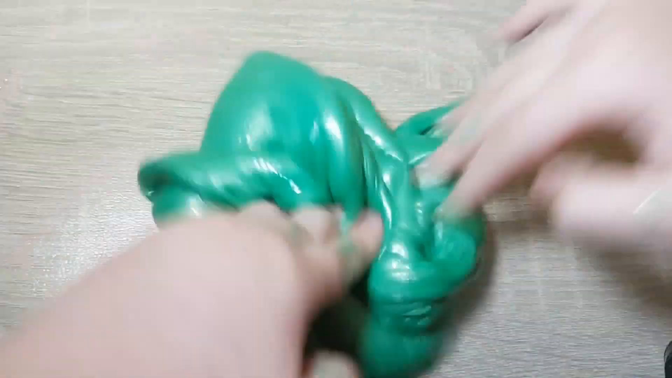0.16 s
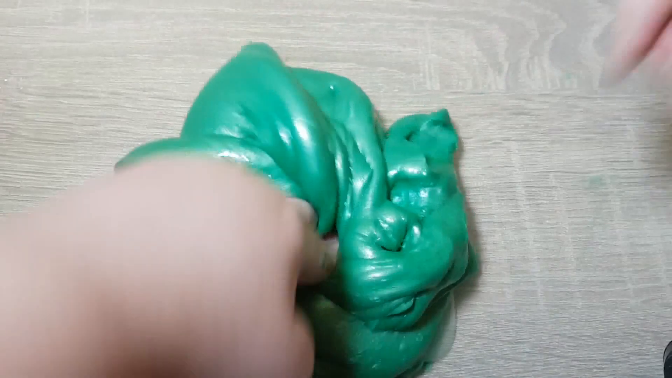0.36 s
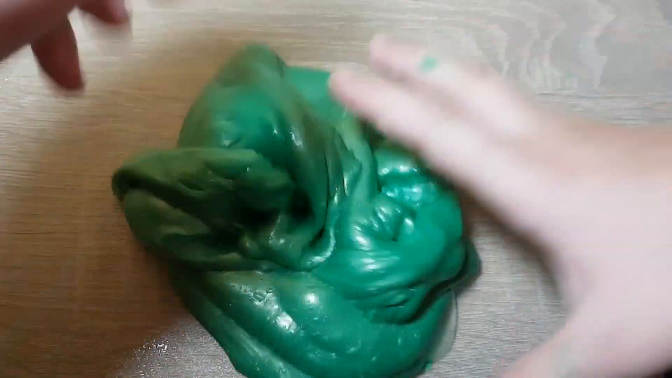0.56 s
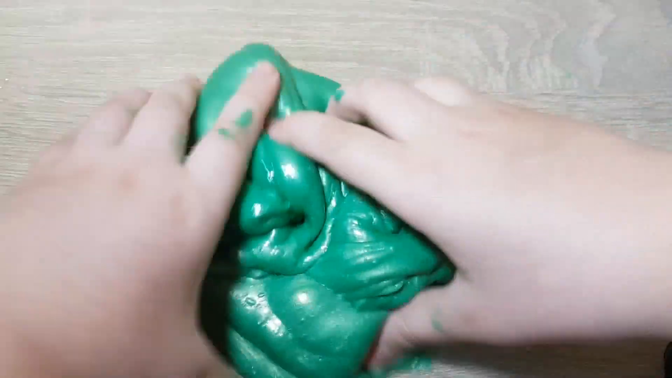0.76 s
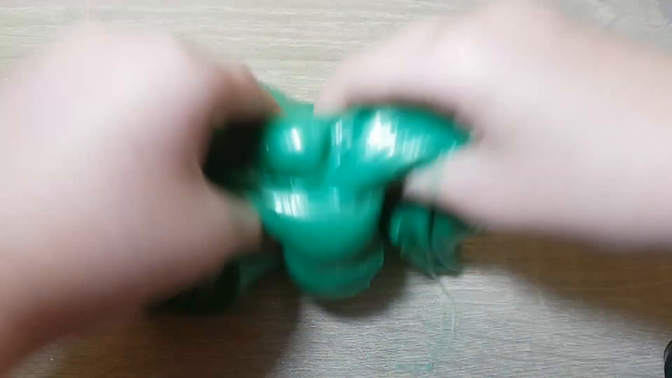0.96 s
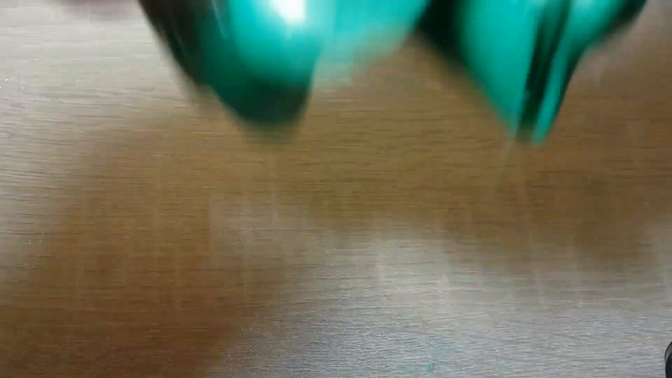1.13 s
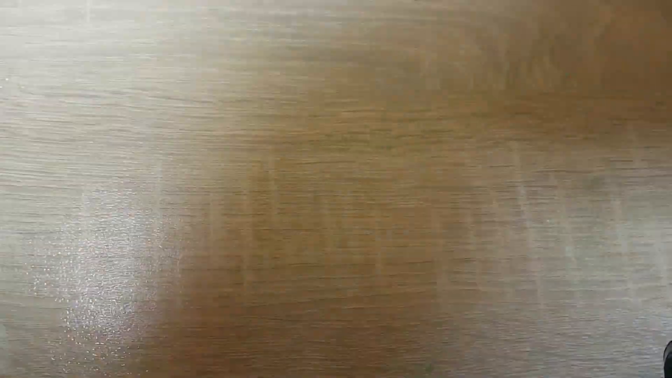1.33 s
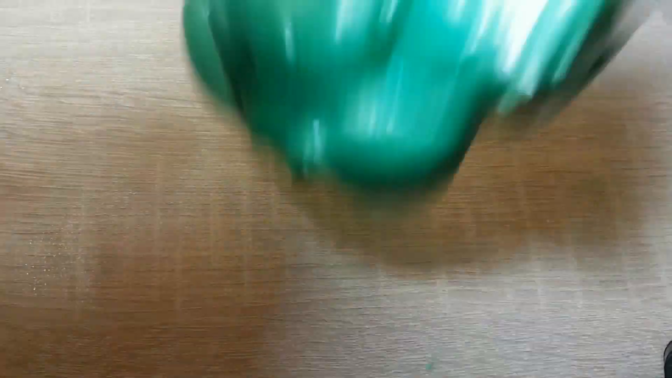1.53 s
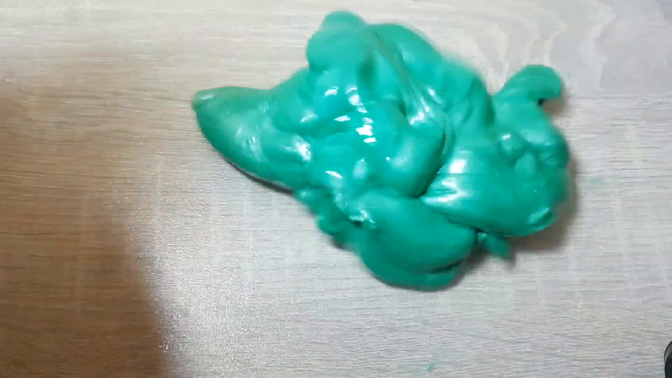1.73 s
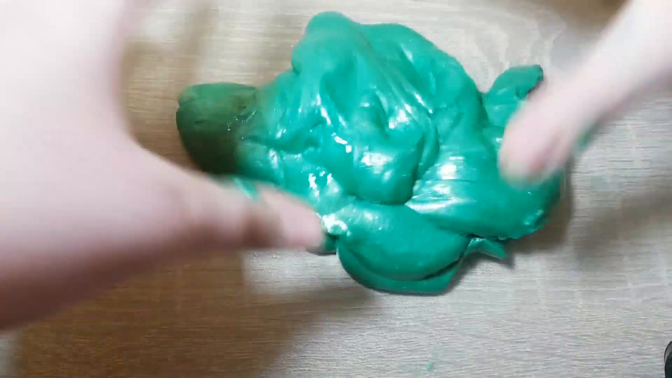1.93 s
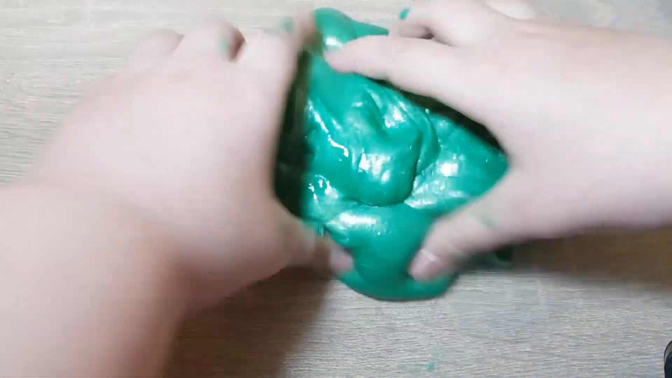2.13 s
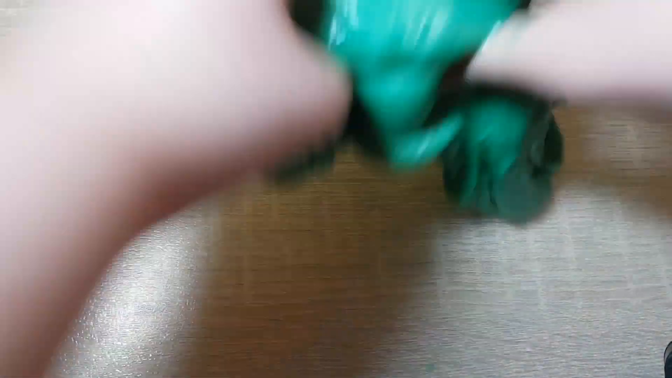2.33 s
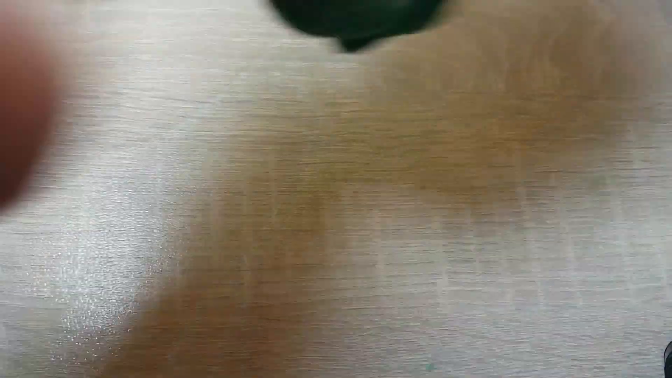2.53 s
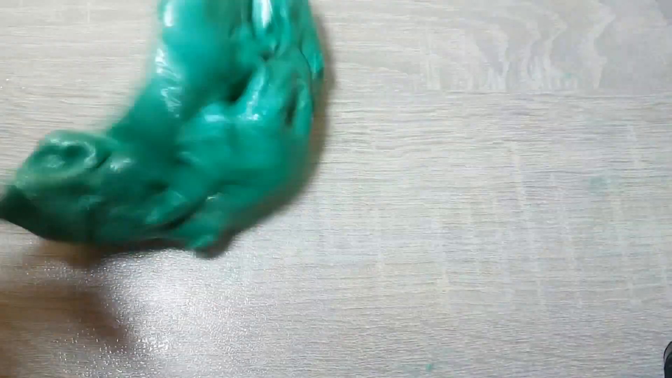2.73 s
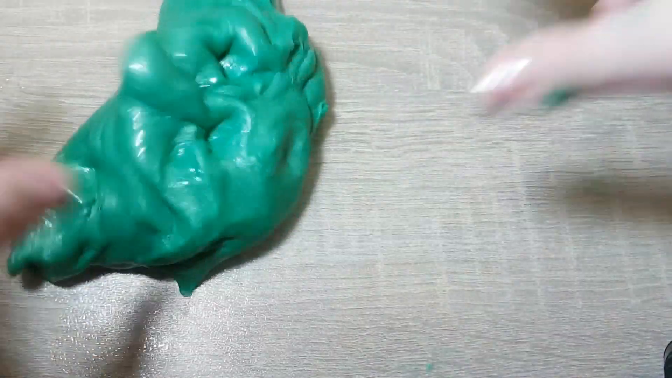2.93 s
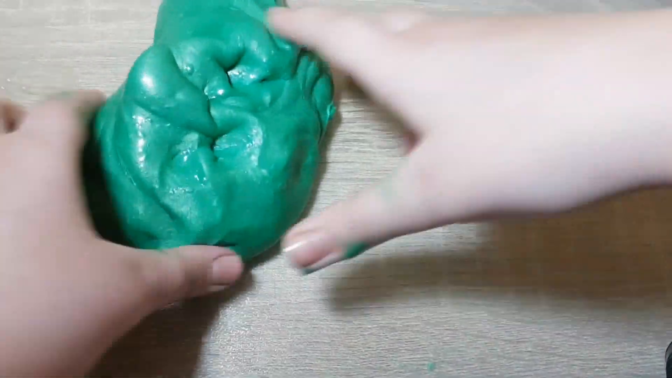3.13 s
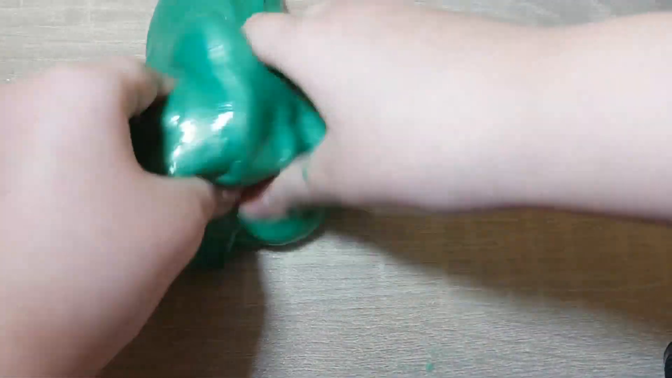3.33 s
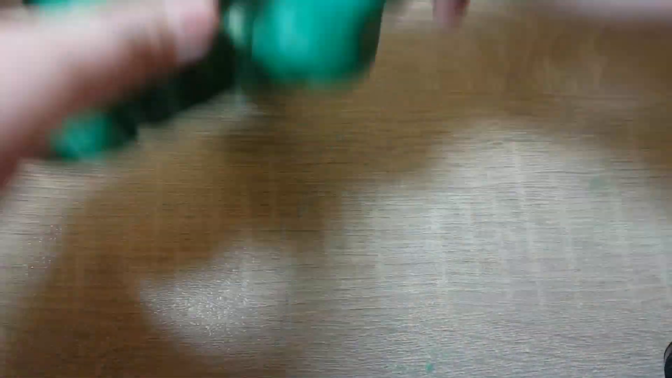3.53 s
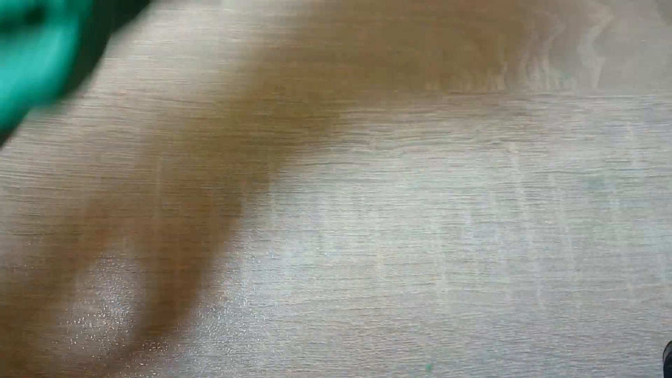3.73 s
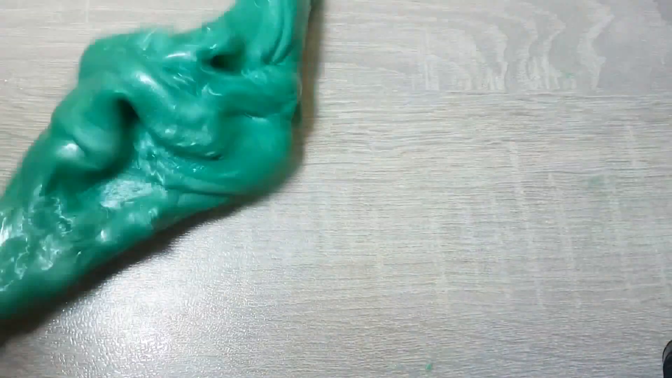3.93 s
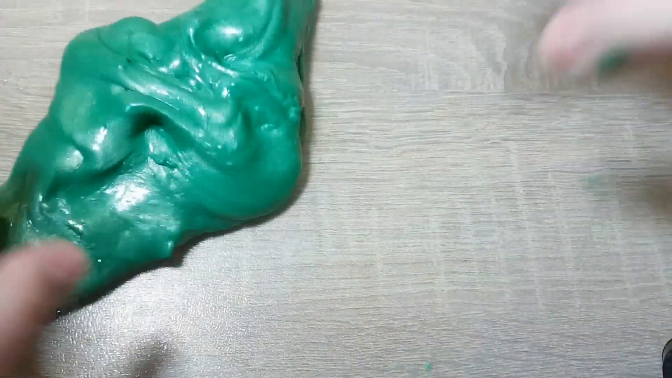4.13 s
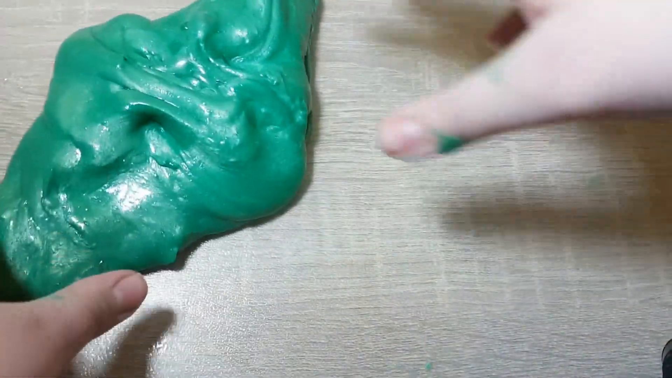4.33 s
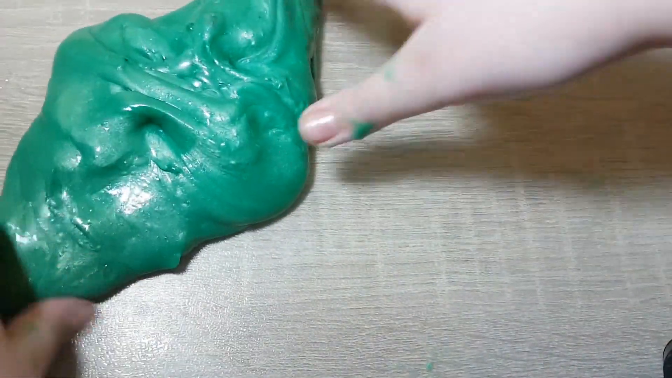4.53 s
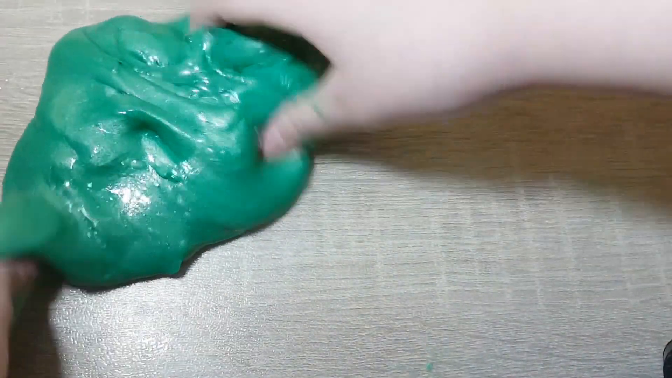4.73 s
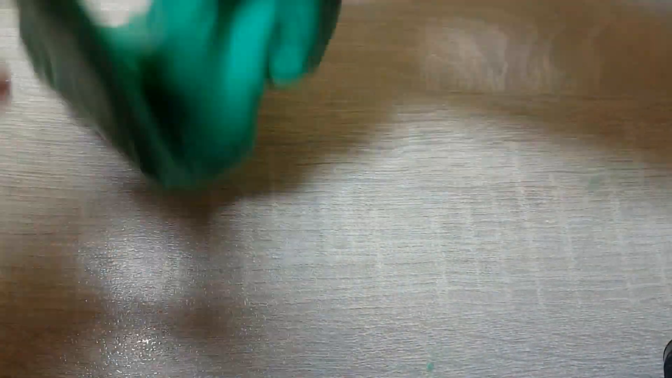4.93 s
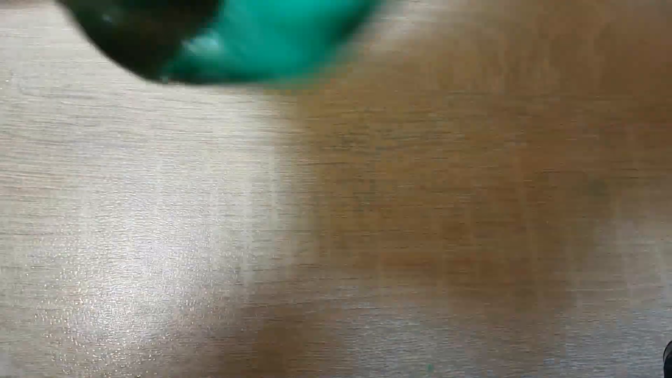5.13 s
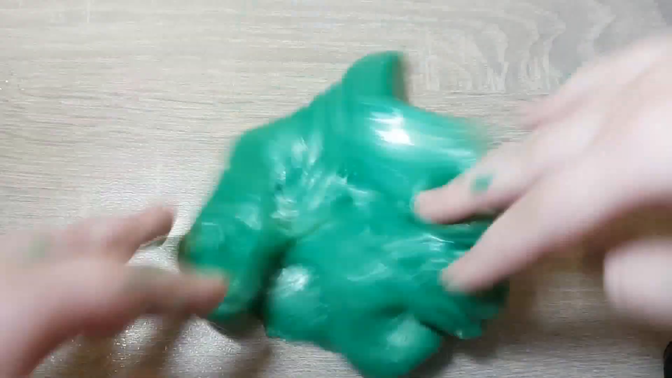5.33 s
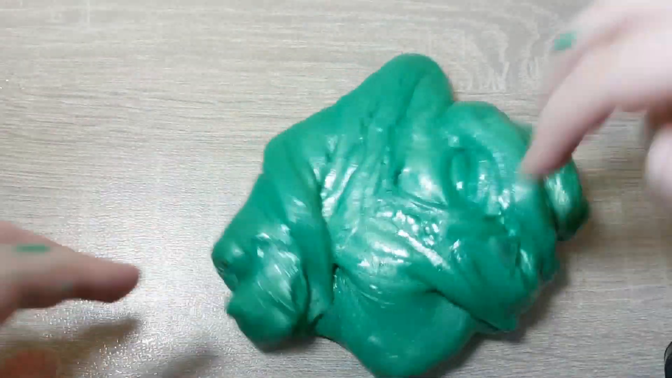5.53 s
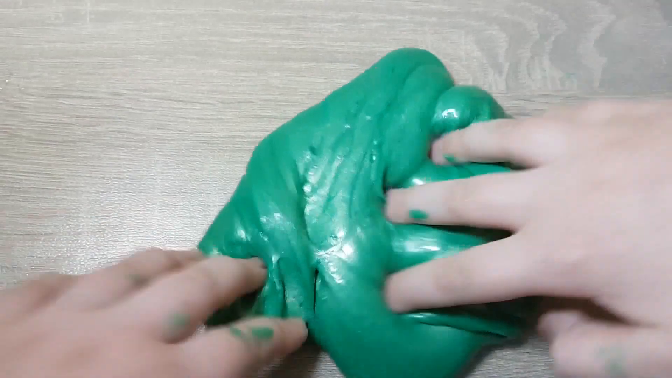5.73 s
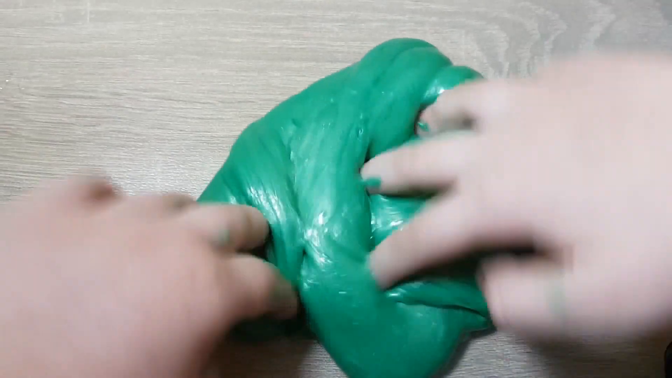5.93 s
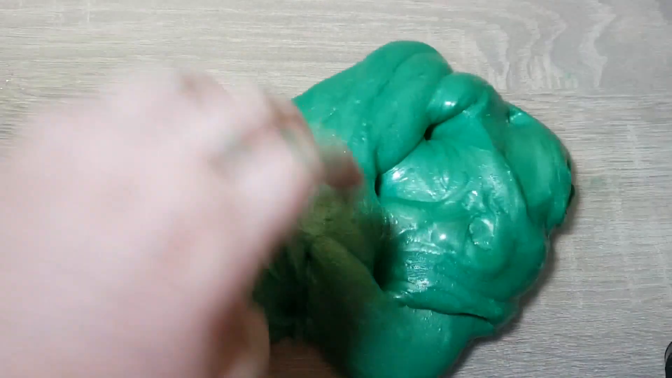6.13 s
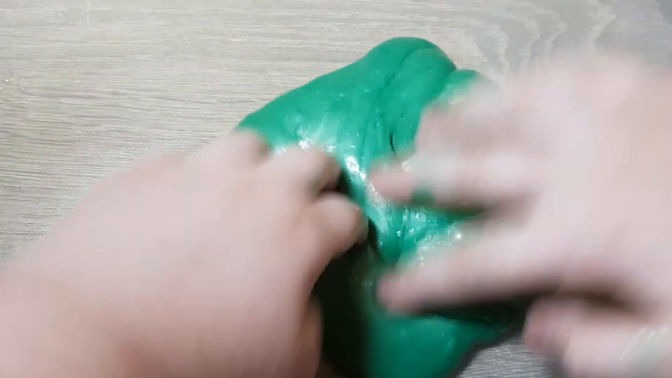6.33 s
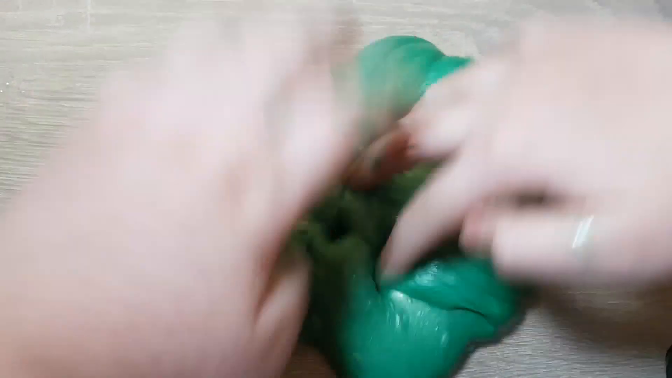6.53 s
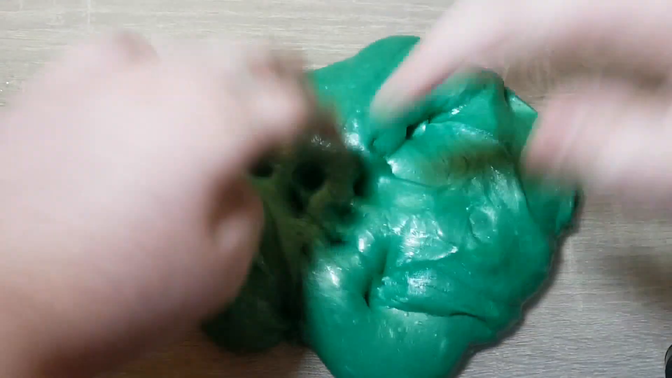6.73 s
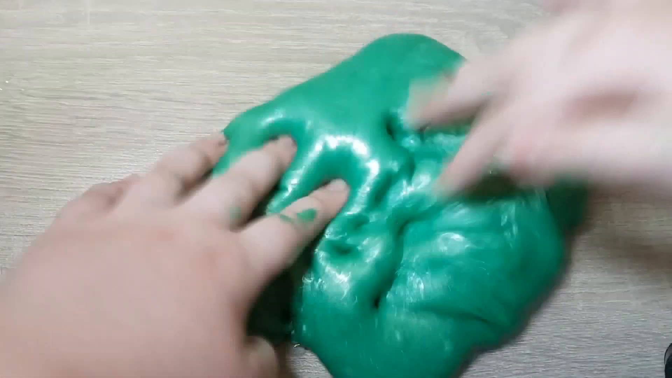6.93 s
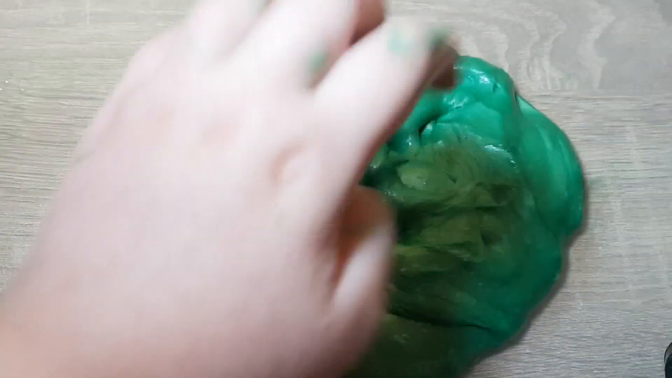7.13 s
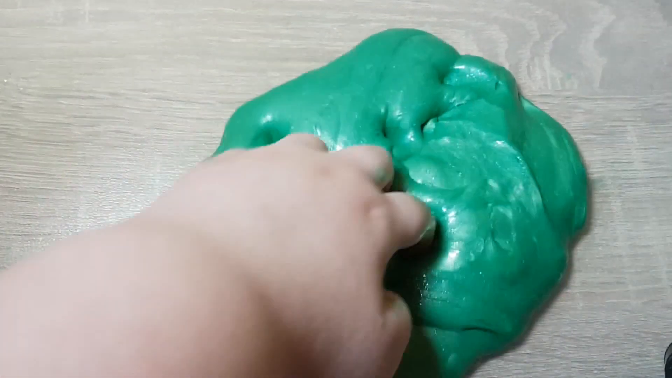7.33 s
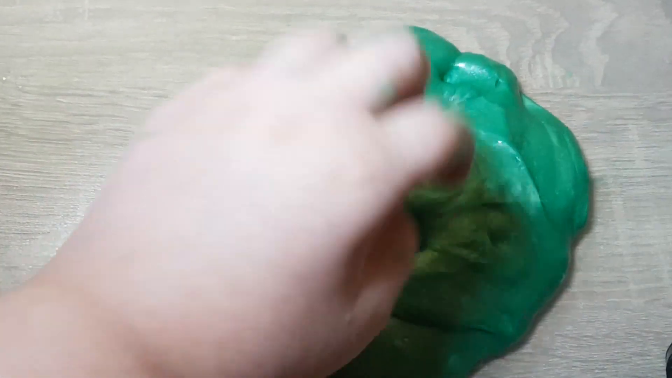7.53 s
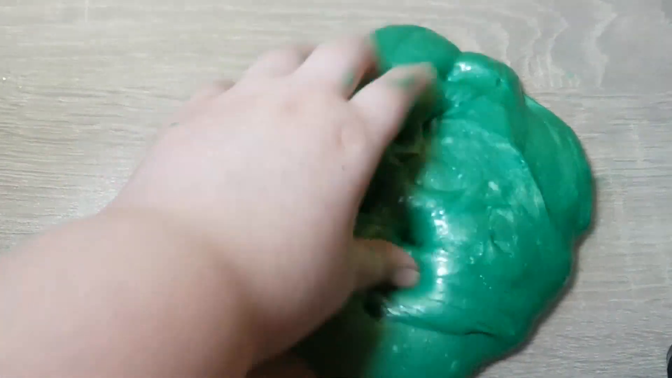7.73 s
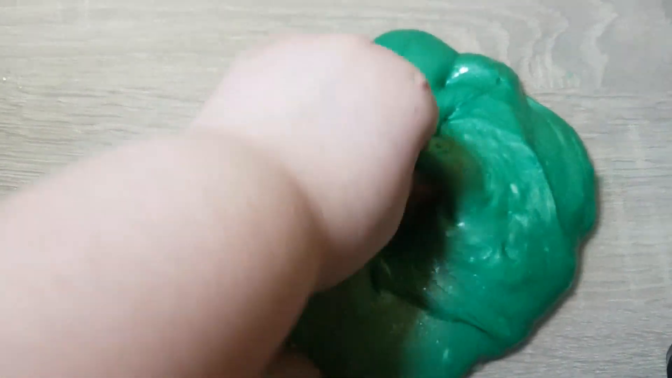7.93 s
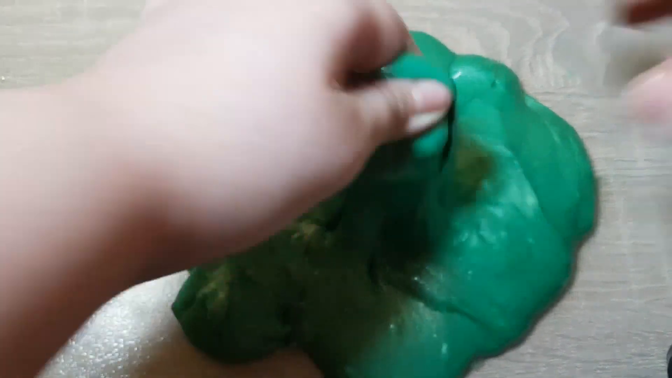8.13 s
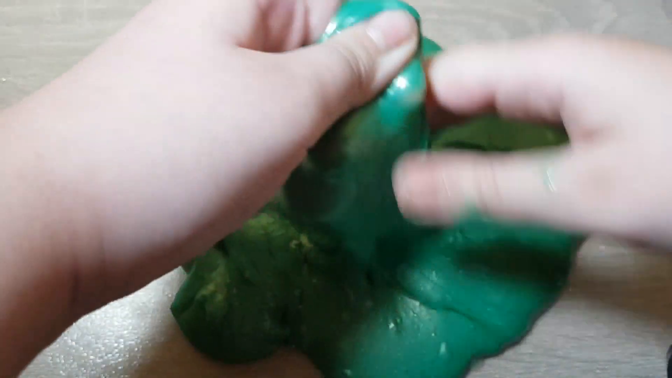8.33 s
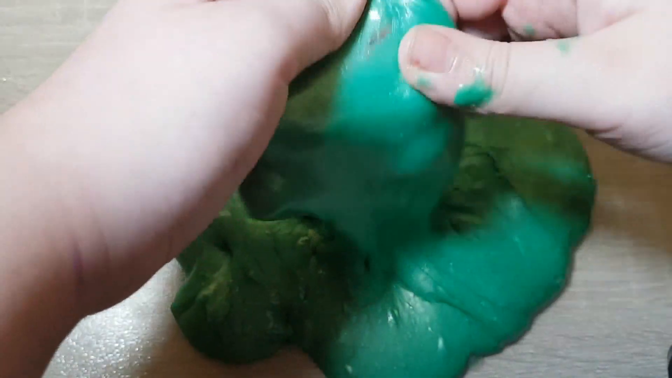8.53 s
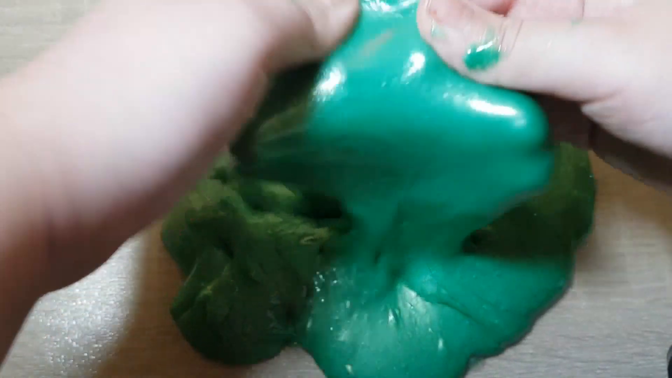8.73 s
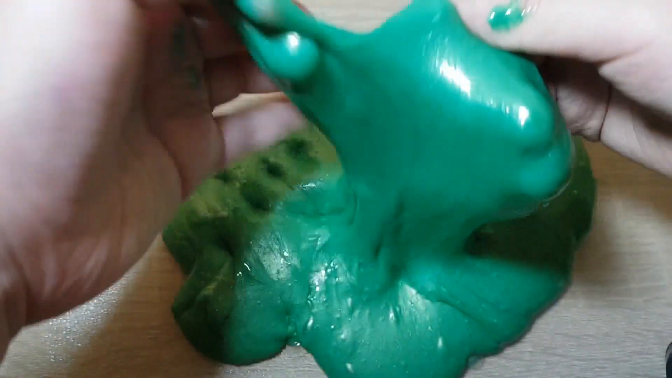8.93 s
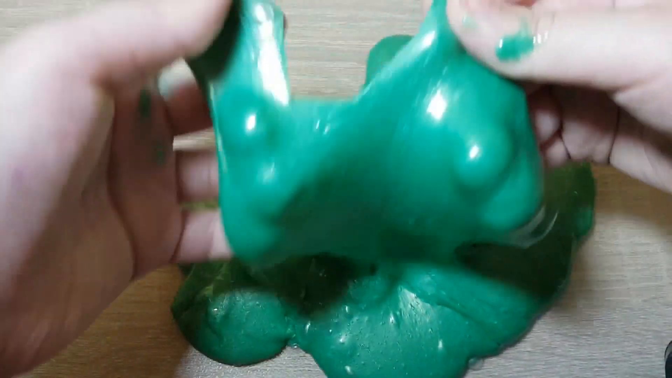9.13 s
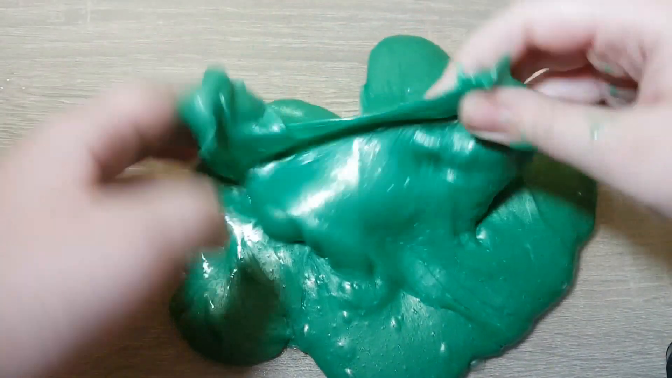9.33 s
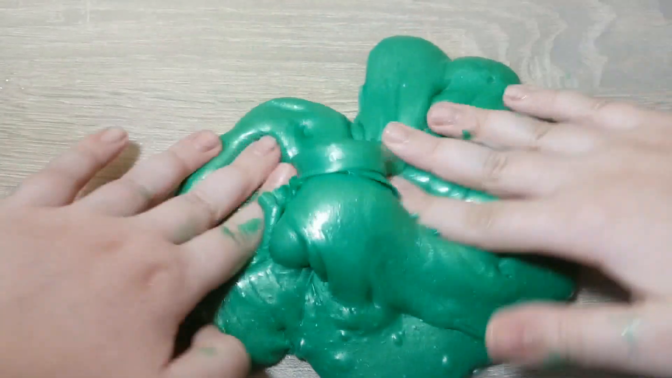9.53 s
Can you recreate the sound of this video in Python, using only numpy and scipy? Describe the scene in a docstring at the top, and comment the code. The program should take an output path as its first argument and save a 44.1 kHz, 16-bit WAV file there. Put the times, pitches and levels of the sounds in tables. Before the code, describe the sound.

Hands knead and poke sticky slime on a wooden table, with wet clicks, dull knocks, squelches and three heavy slaps.

```python
"""Two hands knead a lump of sticky slime on a wooden table in a small room, close to the microphone.
Fingers press and knock dully through the lump, trapped air pockets burst with wet clicks,
and three times the lump is lifted and slapped down. Skin peeling off the slime crackles faintly."""
import sys
import numpy as np
from scipy import signal
from scipy.fft import rfft, irfft
from scipy.io import wavfile

SR = 44100
rng = np.random.default_rng(int(sys.argv[2]) if len(sys.argv) > 2 else 0)


def dump_mix(stems):
    """Bounce the given channels to the path in sys.argv[1] as a 16-bit WAV at rate SR."""
    frames = np.atleast_2d(stems).T  # one column per channel
    limited = np.clip(frames, -1, 1)  # hard clip at full scale
    pcm = np.round(limited * 32767).astype(np.int16)
    wavfile.write(sys.argv[1], SR, pcm)


N = 422458

# air pockets bursting: (s, pop dB, pocket pitch Hz, crack dB)
POPS = [(0.1167, -64, 3160, -62), (.230, -49.5, 3120, -80), (.240, -50.5, 1900, -73), (.294, -61, 990, -56),
        (.576, -39, 4740, -38), (0.5885, -36, 1410, -49), (0.903, -77, 2390, -67),
        (.985, -49, 2070, -61), (1.730, -34.5, 2460, -43.5),
        (1.744, -40, 1900, -67), (1.756, -24, 1810, -37.5), (1.868, -49, 870, -75), (2.7936, -38.5, 2500, -52),
        (2.8201, -49, 2480, -55.5), (2.837, -50.5, 3400, -56.5), (3.640, -45, 1410, -68), (3.706, -55, 1070, -66), (4.014, -25, 1610, -49),
        (4.021, -37, 3700, -49), (4.082, -50, 2950, -57), (4.126, -52.5, 870, -60.5),
        (5.181, -60, 2450, -84), (5.419, -32, 1460, -59),
        (5.445, -42, 1570, -43), (5.457, -37.5, 1970, -67), (5.4777, -44, 3200, -64), (5.960, -63, 3230, -57.5),
        (6.1155, -48.5, 1920, -61), (6.134, -53, 2150, -60), (6.144, -35, 1980, -44.5), (6.148, -37.5, 900, -65), (6.349, -54.5, 1130, -67), (6.377, -74, 1420, -66.5),
        (6.524, -58, 3140, -63), (6.706, -49, 805, -57), (6.725, -46, 1830, -55), (6.7423, -44.5, 2930, -62),
        (6.868, -50.5, 1100, -61), (6.941, -39.5, 2820, -54), (6.950, -49.5, 4480, -54.5), (7.068, -40, 1800, -63), (7.072, -34, 2100, -46),
        (7.191, -46.5, 1440, -64), (7.265, -46.5, 1340, -71), (7.380, -40, 1720, -44.5), (7.387, -33, 737, -52),
        (7.623, -52.5, 3150, -58.5), (7.636, -50, 820, -59.5), (8.204, -44.5, 1270, -71.5), (8.593, -60.5, 4320, -67),
        (8.871, -64, 2220, -69.5), (9.130, -59, 2070, -91)]
# the whole lump lands: (s, smack dB, smack length ms, spray dB, spray fading ms, wobble dB)
SLAPS = [(1.7557, -23, 1.1, -24.5, 3.4, -37), (4.015, -10, 1.545, -19.5, 2.4, -41), (5.4191, -11.5, 1.96, -17.5, 4.3, -31.5)]
SLAP_COLOUR = [(30, -25), (120, -2.5), (220, -18), (450, -0.5), (650, -22), (850, -23), (1600, -14), (3000, -21.5), (6000, -30.5), (9000, -29.5), (15000, -32.5)]   # (Hz, dB)
# the air let out of a pocket: (Hz, dB)
POP_COLOUR = [(200, -34), (500, 9), (1000, 9), (2000, 6.5), (3500, 1.5), (5000, -2.5), (8000, -25), (16000, -42)]
# the table: (Hz, dB, t60 s)
TABLE = [(31.9, -50, 0.8), (75, -25, 0.44), (115.7, -21, 0.15), (175.2, -29, 0.11), (272.7, -36.5, 0.42), (331.4, -26.5, 0.21), (403, -36.5, .2), (619, -36.5, 0.29), (753, -34.5, 0.091), (994, -18, 0.1), (1694, -35.5, 0.052), (2030, -24, 0.13), (2770, -47.5, .16)]
# the background swells and sinks a little: (s, dB)
HISS_LEVEL = [(0.0, -67.5), (0.1, -70.5), (0.34, -71), (1.31, -70), (2.13, -73.5), (2.37, -69.5), (3.15, -73), (3.47, -70.5),
              (4.94, -71.5), (5.36, -69.5), (5.74, -72.5), (7.34, -66), (7.76, -70.5), (9.58, -69.5)]
HISS = [(22, -6), (43, -4.5), (110, -4), (250, -5.5), (450, -10), (700, -14), (1000, -13), (1500, -13.5), (2200, -16.5), (3200, -22), (5000, -28), (9500, -33), (13000, -30), (16000, -26)]   # (Hz, dB)
PRESS_COLOUR = [(40, -21), (90, 0), (160, -1.5), (300, 1.5), (450, -7.5), (700, -15), (1500, -32), (4000, -43)]   # (Hz, dB)
PEEL_COLOUR = [(400, -15), (1200, 2), (2800, 3), (5000, -1.5), (7500, 3), (9500, -6), (13000, -0.5), (16000, -13)]   # (Hz, dB)
ROOM_COLOUR = [(50, 1.5), (150, -3), (300, 3), (650, 5), (1200, -8), (3000, 2), (7000, 3.5), (15000, 3)]   # (Hz, dB)
ROOM_T60 = [(100, 0.42), (400, 0.2), (1500, 0.3), (5000, 0.18), (14000, 0.17)]   # (Hz, s)
LIKENESS = [(40, 0.61), (150, 0.83), (350, 0.82), (700, 0.38), (1400, 0.023), (3000, 0), (16000, 0.03)]   # (Hz, left-right correlation)
BALANCE_DB = [(60, -0.5), (300, -1.5), (700, -1.5), (1500, -2.5), (6000, -3), (9000, 2), (15000, 0.5)]   # (Hz, left minus right dB)
CUTOFF_HZ = 16050   # fixed
# the torn film of a pocket: (Hz, dB)
CRACK_COLOUR = [(1000, -69), (3000, -40), (5500, 0.5), (7500, 7), (9000, 1), (12500, 4), (16000, -7.5)]
# faint narrow tones in the room air: (Hz, width Hz, dB)
AIR_TONES = [(718, 27, 0), (1537, 51, 1.5)]
# their strength: (s, dB)
AIR_LEVEL = [(0, -114), (4, -76.5), (6, -76), (8, -73), (9.58, -72)]
# how unevenly wet slime crackles (dB)
RAGGED_DB = 6   # fixed
# fingers, or the lump's own weight, drive the slime onto the table: (s, knock dB, knock pitch Hz, squelch dB, squelch tilt dB per octave)
PUSHES = [(0.066, -46.5, 430, -61.5, 0), (.246, -42.5, 380, -65, -0.5), (0.292, -37.5, 280, -70, 3), (0.56, -37, 286, -77, 5),
          (.586, -49, 303, -37, -10), (.782, -47, 257, -67, -10),
          (.795, -36.5, 343, -52, -3.5), (.870, -45, 290, -63.5, 1), (1.325, -48, 222, -65, 1.5), (1.731, -33.5, 238, -55, 1),
          (1.756, -23.5, 238, -48.5, -4), (2.208, -31, 302, -57, -0.5), (2.273, -35, 236, -66, -3), (2.296, -27.5, 276, -43, -3.5),
          (2.802, -35, 302, -57.5, 1.5), (2.827, -32.5, 308, -72.5, 7), (2.957, -43, 360, -70, 3), (3.251, -24, 303, -47, -2),
          (3.266, -38, 298, -49, -15), (3.300, -37, 338, -39, -15), (3.637, -34, 277, -55.5, 2), (4.014, -15, 503, -38.5, -0.5), (4.022, -18.5, 593, -39, -7),
          (4.607, -33.5, 263, -64, 0.5), (4.700, -50, 345, -58.5, -3), (4.722, -38, 341, -54.5, -2.5), (4.988, -40, 217, -64.5, 0), (5.358, -36.5, 231, -60, -1.5),
          (5.421, -37, 288, -34.5, -2.5), (5.965, -40.5, 230, -54, -3.5), (6.024, -55, 303, -64, -2.5), (6.116, -38.5, 262, -62, -13), (6.136, -29, 273, -47.5, -8),
          (6.190, -41.5, 239, -62, -8), (6.511, -30.5, 289, -51, -2.5), (6.726, -30.5, 257, -52, 0.5), (6.752, -35.5, 227, -66, 2), (6.868, -36.5, 280, -55, -11), (6.950, -36, 235, -52, -4),
          (7.075, -33, 212, -48, -14), (7.194, -35, 272, -56.5, 2), (7.385, -16.5, 248, -42, -4.5), (7.639, -41, 288, -56, -3.5),
          (8.202, -43, 334, -54, -3.5), (8.754, -53, 257, -72, -6.5), (9.457, -51, 426, -77, 2)]
KNOCK_CYCLES = .55   # a knock peaks after this share of a cycle
SLUMP_S, SLUMP_LOSS_DB = 0.024, 14   # the slime then slumps in weaker knocks: their spacing, the loss at each
SQUELCH_LEAD_S, SQUELCH_SWELL_S = .004, .013   # air escapes from just before the knock on
# fingertips touch down on the table: (s, peak dB)
TAPS = [(1.348, -48), (2.189, -46.5), (3.15, -47), (3.506, -48), (4.437, -43), (4.489, -46.5), (6.323, -43.5), (6.391, -46)]
TAP_HZ = 150
# palms lean on the lump: (s, length s, dB)
PRESSES = [(.80, 0.18, -59.5), (3.30, 0.079, -50), (3.65, 0.058, -51), (4.70, .07, -50.5), (6.01, .05, -49), (6.15, 0.042, -56), (6.70, 0.58, -64.5)]
PRESS_ATTACK_S, PRESS_RELEASE_S = .03, 0.038
# slime is pulled off skin or table: (s, length s, dB at the start)
PEELS = [(.02, 0.12, -69), (.95, 0.66, -75), (2.28, .12, -67), (2.53, 0.086, -69.5), (3.35, 0.52, -72.5), (4.92, 0.26, -74.5), (5.92, 0.044, -69), (6.51, 0.063, -63.5),
         (7.15, 0.31, -92), (8.05, 0.43, -76)]
PEEL_ATTACK_S, PEEL_RELEASE_S, STRETCH_DB_PER_S = 0.023, 0.02, 10   # a pull grows louder as the slime stretches
# a soft swish as the arms lift the lump: (s, length s, dB)
SWISHES = [(1.07, 0.43, -68.5), (3.42, 0.067, -63.5)]
SWISH_ATTACK_S, SWISH_RELEASE_S = 0.16, .1
SWISH_COLOUR = [(300, -10), (650, 4), (1000, -19), (3000, -19), (8000, -46)]   # (Hz, dB)
SLUMP_PITCH_RATIO = .92   # each slump is lower than the knock before it
NEIGHBOUR_DELAY_S, NEIGHBOUR_SPREAD_S = .009, .009   # smaller pockets give way around each burst
NEIGHBOUR_POP_DB, NEIGHBOUR_CRACK_DB = -11.5, -10
# a finger comes out and the hollow it leaves rings: (s, peak dB, pitch Hz)
PLOPS = [(0.5801, -24, 330), (.591, -27.5, 390), (2.309, -30.5, 325), (3.262, -25, 280), (8.2055, -18.5, 288)]
PLOP_CYCLES = 0.83   # a plop peaks after this share of a cycle
WOBBLE_HZ, WOBBLE_CYCLES = 137, 1.16   # the landed lump shakes like jelly
FLUTTER_PER_S = 25   # skin sticks and slips this often
PLOP_PUFF_DB = -11   # a plop rings cleanly, with less rumble than a knock


def from_db(db):
    return 10 ** (np.asarray(db) / 20)


def rms_one(x):
    return x / np.sqrt(np.mean(x ** 2) + 1e-20)


def in_time(rows):
    s, *columns = np.transpose(rows)
    return [np.interp(np.arange(N) / SR, s, c) for c in columns]


def at_hz(points, hz):
    return np.interp(np.log(np.maximum(hz, 1)), np.log(np.array(points)[:, 0]), np.array(points)[:, 1])


def add(out, s, sound):
    """Mix a sound in from time s on."""
    start = round(s * SR)
    out[..., start:start + sound.shape[-1]] += sound[..., :N - start]


def seconds(size):
    return np.arange(size) / SR


def through(x, response):
    """Convolve, channel by channel."""
    return signal.fftconvolve(np.atleast_2d(x), np.atleast_2d(response), axes=-1)[:, :x.shape[-1]]


def causal(gain, size=4096):
    """The quickest-dying response with these gains per frequency bin."""
    cepstrum = irfft(np.log(gain + 1e-9))
    cepstrum[1:size // 2] *= 2
    cepstrum[size // 2 + 1:] = 0
    return irfft(np.exp(rfft(cepstrum)))


def colour(x, points, size=4096):
    """Filter by a spectrum of (Hz, dB); white noise keeps its power."""
    response = causal(from_db(at_hz(points, np.fft.rfftfreq(size, 1 / SR))))
    return through(x, response / np.linalg.norm(response))


def stereo_noise(size):
    """White noise at two microphone ports: alike in the bass, unrelated in the treble."""
    mid, side = rfft(rng.standard_normal((2, size)))
    alike = np.clip(at_hz(LIKENESS, np.fft.rfftfreq(size, 1 / SR)), -.99, .99)
    return irfft(np.sqrt((1 + alike) / 2) * mid + np.sqrt((1 - alike) / 2) * side * [[1], [-1]], size)


def burst(fade_ms, ragged_db=0, size=4096):
    """A spray of tiny ruptures that dies away at once; a ragged one comes in clumps of about a millisecond."""
    t = seconds(size)
    knots = np.arange(0, t[-1], .0012)  # fixed
    clumps = from_db(ragged_db * np.interp(t, knots, np.clip(rng.standard_normal(len(knots)), -2, 2)))
    fade = np.exp(-t * 1e3 / max(fade_ms, .05))  # fixed
    spray = stereo_noise(size) * fade * clumps
    return spray * np.linalg.norm(fade) / np.linalg.norm(spray, axis=1, keepdims=True)


def thumps(level_db=0, sag=0.051, puff_db=-11, low_hz=90, size=4096):
    """A soft push swells and dies in a few cycles; its pitch sags as the slime spreads and puffs out air."""
    tone, effort, t = np.zeros(N), np.zeros(N), seconds(size)
    for s, db, hz, cycles, air_db in knocks():
        age = t * hz / cycles
        pitch = hz * (1 + sag * (2 * np.exp(-age / 2) - 1))
        swell = from_db(db + level_db) * age * np.exp(1 - age)
        add(tone, s, swell * np.sin(2 * np.pi * np.cumsum(pitch) / SR))
        add(effort, s, from_db(air_db) * swell)
    puffs = from_db(puff_db) * colour(effort * stereo_noise(N), PRESS_COLOUR)
    return signal.sosfilt(signal.butter(2, low_hz, "high", fs=SR, output="sos"), tone + puffs)


def pops(air_db=6, crack_db=11, tear_ms=1.0, fizz_ms=9.5, fizz_db=-18, pocket_db=7, cycles=2.7, size=2048):
    """The film tears with a crack, the opened pocket puffs and rings briefly, and the wet rim fizzes."""
    cracks, puffs, pockets = np.zeros((3, 2, N))
    t = seconds(size)
    for s, db, hz, top_db in ruptures():
        tear = burst(tear_ms, size=size)
        add(cracks, s, from_db(top_db + crack_db) * tear)
        fizz = from_db(fizz_db) * burst(fizz_ms, RAGGED_DB, size=size)
        add(puffs, s, from_db(db + air_db) * (tear + fizz))
        port_phase = rng.normal(0, 0.81, (2, 1))
        add(pockets, s, from_db(db + pocket_db) * np.exp(-t * hz / cycles) * np.sin(2 * np.pi * hz * t + port_phase))
    return colour(cracks, CRACK_COLOUR) + colour(puffs, POP_COLOUR) + pockets


def slaps(settle_ms=20.5, settle_db=-15, soft_hz=1800):
    """The lump lands flat: trapped air gives one N-shaped smack, then a wet spray as it settles."""
    smacks, spray = np.zeros(N), np.zeros((2, N))
    for s, smack_db, smack_ms, spray_db, fade_ms, _ in SLAPS:
        ramp = seconds(size=512) * 1e3 / smack_ms  # fixed
        add(smacks, s, from_db(smack_db) * (2 * ramp - 1) * (ramp < 1))
        add(spray, s, from_db(spray_db) * (burst(fade_ms) + from_db(settle_db) * burst(settle_ms, RAGGED_DB)))
    return signal.sosfilt(signal.butter(2, soft_hz, fs=SR, output="sos"), smacks) + colour(spray, SLAP_COLOUR)


def table(force, level_db=-30, size=44100):
    """The table top rings under every blow and sways on its legs."""
    t = seconds(size)
    modes = sum(from_db(db - 60 * t / t60) * np.sin(2 * np.pi * hz * t) for hz, db, t60 in TABLE)  # fixed
    return from_db(level_db) * through(force, modes)


def handling(press_db=-1, peel_db=-4, cling_db=-86, crackle_db=-8, threads_per_s=400, spread_db=8.0):
    """Palms rumble against the lump once they press; skin peels off with a hiss and snapping threads, and always clings a little."""
    grip = strokes(PRESSES, PRESS_ATTACK_S, PRESS_RELEASE_S) * flutter(depth_db=5.0)
    pull = strokes(PEELS, PEEL_ATTACK_S, PEEL_RELEASE_S, STRETCH_DB_PER_S) * flutter(depth_db=2.5) + from_db(cling_db)
    rumble = from_db(press_db) * grip * colour(stereo_noise(N), PRESS_COLOUR)
    strength = np.minimum(rng.exponential(1, N), 3)  # fixed
    snaps = (rng.random(N) < threads_per_s / SR) * from_db(spread_db * strength)
    crackle = rms_one(through(snaps * rng.choice([-1, 1], N), burst(1.0)))
    peeling = from_db(peel_db) * stereo_noise(N) + from_db(crackle_db) * crackle
    return rumble + pull * colour(peeling, PEEL_COLOUR)


def room(x, wet_db=-11, gap_s=0.00067, near_db=-12, near_ms=5.1, size=22050):
    """Quick reflections off the table and arms, then a short tail that dies sooner in the treble."""
    t, white, tail = seconds(size), rfft(stereo_noise(size)), 0
    hz = np.fft.rfftfreq(size, 1 / SR)
    centres = np.array(ROOM_T60)[:, 0]
    for (centre, t60), share in zip(ROOM_T60, np.eye(len(centres))):
        band = white * at_hz(np.c_[centres, share], hz) * from_db(at_hz(ROOM_COLOUR, hz))
        tail = tail + irfft(band, size) * from_db(-60 * t / t60)  # fixed
    tail = tail * (1 - np.exp(-(t / gap_s) ** 2))
    near = burst(near_ms) * (1 - np.exp(-seconds(size=4096) / 0.0015))
    return from_db(wet_db) * through(x, tail / np.linalg.norm(tail[0])) + from_db(near_db) * through(x, near / np.linalg.norm(near[0]))


def background(level_db=7):
    """Steady room air and microphone hiss, with a few faint whistling bands."""
    level, = in_time(HISS_LEVEL)
    tone_level, = in_time(AIR_LEVEL)
    white = stereo_noise(N)
    tones = sum(from_db(db) * signal.lfilter(*signal.iirpeak(hz, hz / np.clip(width, 20, 150), fs=SR), white) for hz, width, db in AIR_TONES)
    return from_db(level + level_db) * colour(stereo_noise(N), HISS) + from_db(tone_level) * rms_one(tones)


def squelches(level_db=0, low_hz=400, high_hz=5000, cycles=2.16, spread_db=1.0, fade_db=-1.0, count=120, size=768):
    """Each squeeze bursts a thick swarm of tiny bubbles that thins out and weakens as the air runs out."""
    out, t = np.zeros((2, N)), seconds(size)
    for s, _, _, db, tilt_db in PUSHES:
        ages = rng.gamma(2, 1, count)
        hz = low_hz * (high_hz / low_hz) ** rng.random((count, 1))
        levels = db + level_db + fade_db * ages[:, None] + spread_db * rng.standard_normal((count, 1)) + tilt_db * np.log2(hz / low_hz)
        phases = rng.uniform(0, 2 * np.pi, (count, 1)) + rng.normal(0, 0.73, (2, count, 1))
        rings = from_db(levels) * np.exp(-t * hz / cycles) * (1 - np.exp(-4 * t * hz)) * np.sin(2 * np.pi * hz * t + phases)
        for k, age in enumerate(ages):
            add(out, s - SQUELCH_LEAD_S + age * SQUELCH_SWELL_S, rings[:, k])
    return out


def strokes(rows, attack_s, release_s, growth_db_per_s=0):
    """Gain of hand movements: each fades in, holds or grows for its length, and dies away."""
    t, gain = seconds(N), 0
    for s, length, db in rows:
        onset = np.clip(1 + (t - s) / attack_s, 0, 1)
        release = np.exp(-np.maximum(t - s - length, 0) / release_s)
        gain = gain + onset * release * from_db(db + growth_db_per_s * np.clip(t - s, 0, length))
    return gain


def knocks(gap_spread=0.3094, pitch_spread=.15, count=2):
    """(s, dB, Hz, cycles to the peak, puff dB) of every low sound: taps, plops, wobbles, and each push with its uneven slumps."""
    rows = [(s, db, TAP_HZ, KNOCK_CYCLES, 0) for s, db in TAPS]
    rows += [(s, db, hz, PLOP_CYCLES, PLOP_PUFF_DB) for s, db, hz in PLOPS]
    rows += [(s, wobble_db, WOBBLE_HZ, WOBBLE_CYCLES, 0) for s, *_, wobble_db in SLAPS]
    for (s, db, hz, _, _), chances in zip(PUSHES, rng.standard_normal((len(PUSHES), count, 2))):
        rows.append((s, db, hz, KNOCK_CYCLES, 0))
        for late, sharp in chances:
            s, db, hz = s + SLUMP_S * np.exp(gap_spread * late), db - SLUMP_LOSS_DB, hz * SLUMP_PITCH_RATIO
            rows.append((s, db, hz * np.exp(pitch_spread * sharp), KNOCK_CYCLES, 0))
    return rows


def swishes():
    """Arms brush softly past the microphone."""
    return strokes(SWISHES, SWISH_ATTACK_S, SWISH_RELEASE_S) * colour(stereo_noise(N), SWISH_COLOUR)


def ruptures(pitch_spread=0.362, count=2):
    """(s, pop dB, Hz, crack dB) of every pocket: each main one takes its small neighbours with it."""
    rows = list(POPS)
    for (s, db, hz, top_db), chances in zip(POPS, rng.standard_normal((len(POPS), count, 2))):
        for late, sharp in np.clip(chances, -2, 2):
            rows.append((s + NEIGHBOUR_DELAY_S + NEIGHBOUR_SPREAD_S * late, db + NEIGHBOUR_POP_DB,
                         hz * np.exp(pitch_spread * sharp), top_db + NEIGHBOUR_CRACK_DB))
    return rows


def flutter(depth_db):
    """The uneven gain of skin that sticks and slips."""
    steps = seconds(N) * FLUTTER_PER_S
    return from_db(depth_db * np.interp(steps, np.arange(N), np.clip(rng.standard_normal(N), -2, 2)))


def scene():
    """Every blow shakes the table; the slime sounds in the room, over the handling and the hiss."""
    blows = thumps() + pops() + slaps()
    slime = blows + table(blows) + squelches()
    return slime + room(slime) + handling() + swishes() + background()


def record(dry, size=4096):
    """Each microphone port has its own colour; the top is cut."""
    lean_db = at_hz(BALANCE_DB, np.fft.rfftfreq(size, 1 / SR)) / 2
    heard = through(dry, np.array([causal(from_db(lean_db)), causal(from_db(-lean_db))]))
    return signal.sosfilt(signal.ellip(10, .1, 70, CUTOFF_HZ, fs=SR, output="sos"), heard)


dry = scene()
out = record(dry)
dump_mix(out)
```